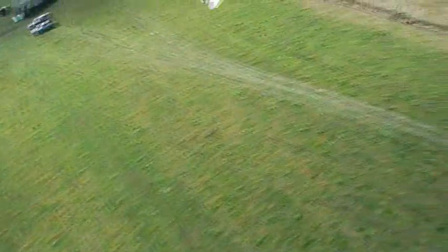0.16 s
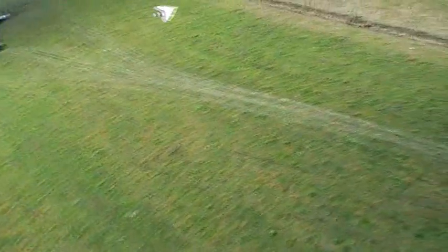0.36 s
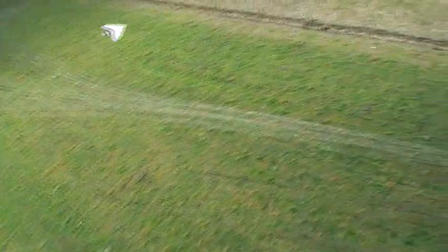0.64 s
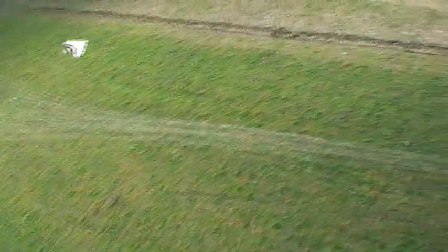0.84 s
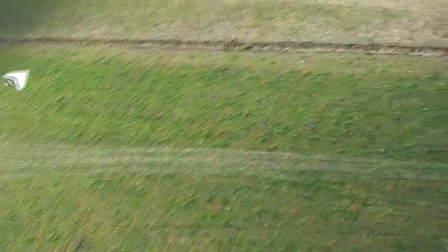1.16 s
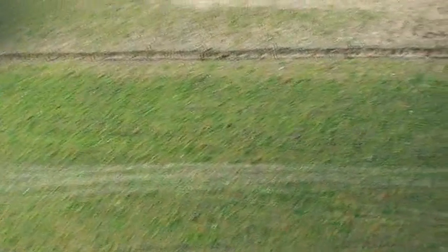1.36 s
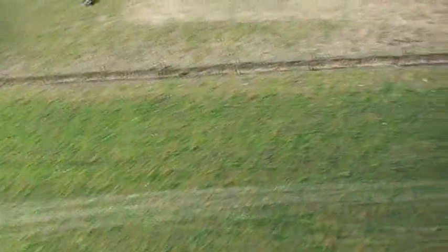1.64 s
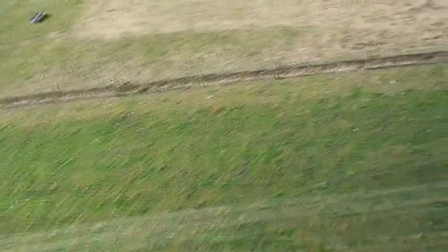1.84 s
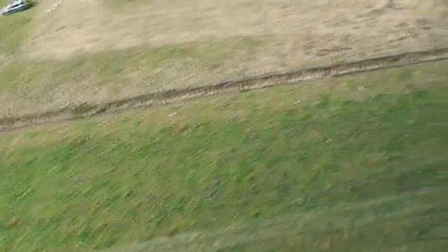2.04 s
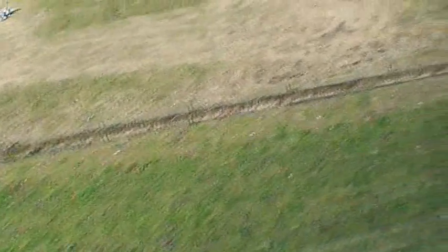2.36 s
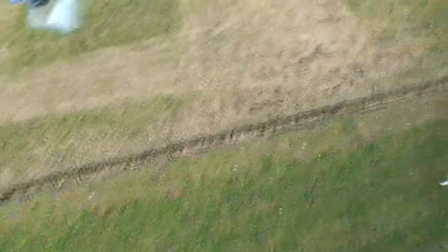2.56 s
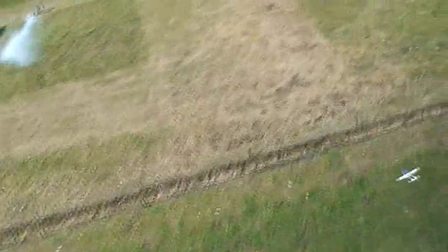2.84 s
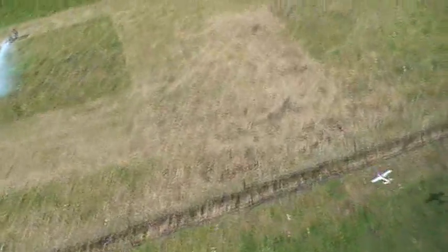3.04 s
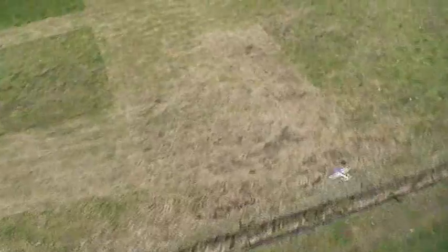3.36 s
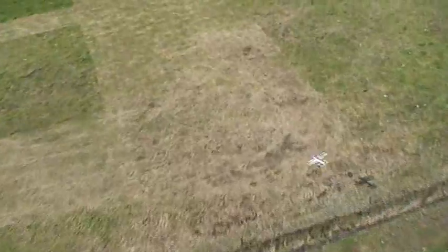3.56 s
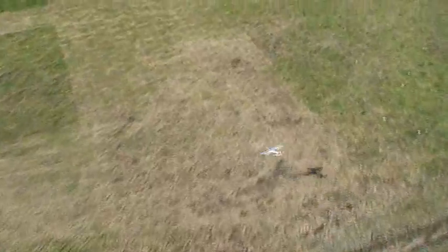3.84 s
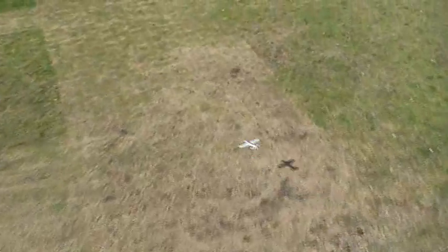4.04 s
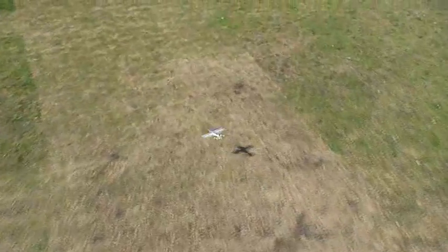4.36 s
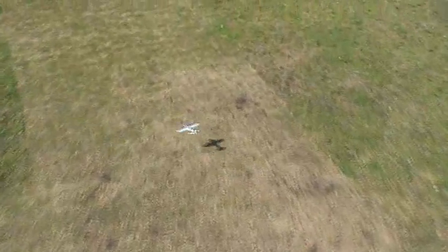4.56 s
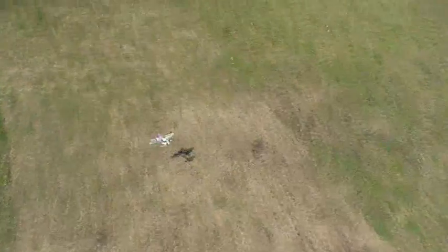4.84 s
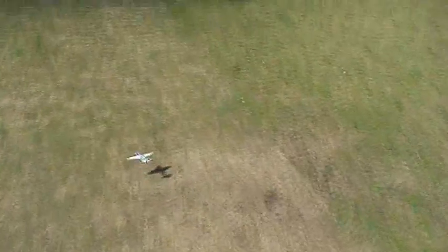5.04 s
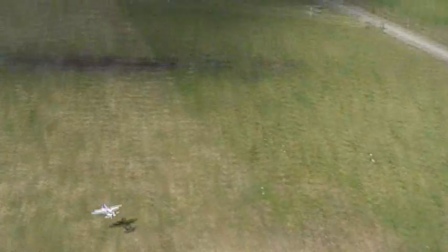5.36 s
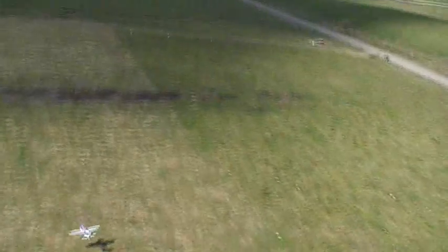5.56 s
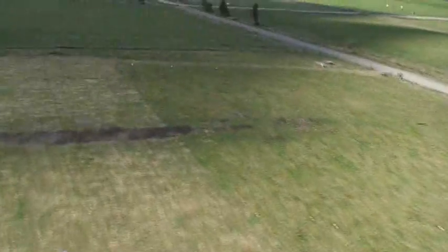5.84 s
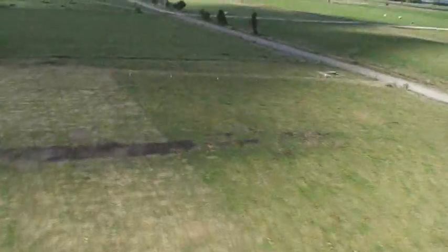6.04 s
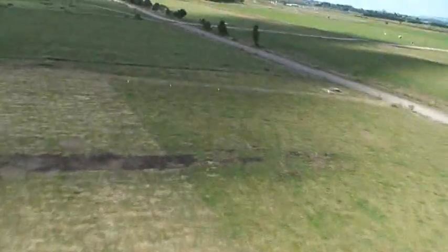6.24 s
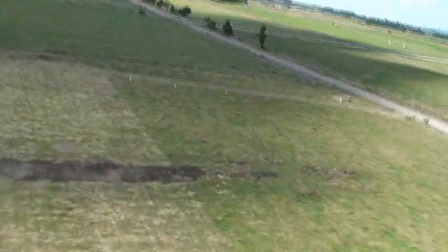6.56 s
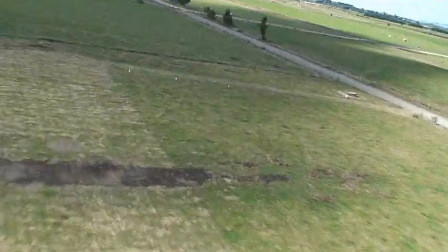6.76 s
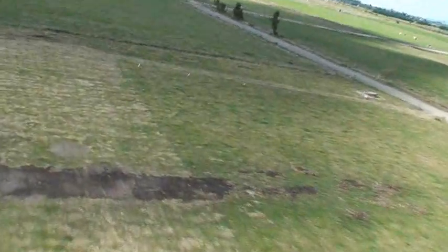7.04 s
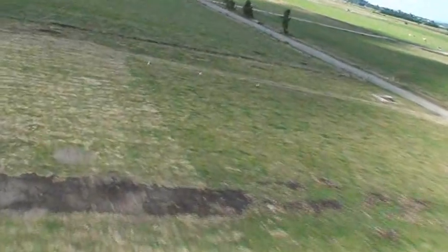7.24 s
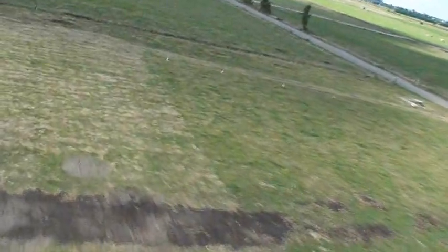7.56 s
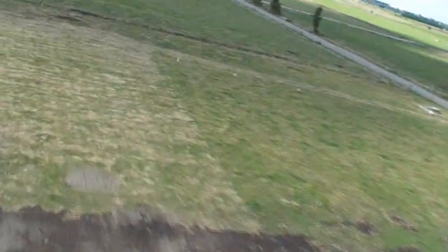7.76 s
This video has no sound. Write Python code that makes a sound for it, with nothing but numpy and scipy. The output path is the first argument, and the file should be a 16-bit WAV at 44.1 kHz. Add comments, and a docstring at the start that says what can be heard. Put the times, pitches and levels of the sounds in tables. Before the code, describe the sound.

Close on-board stereo sound of an electric model helicopter flying over a field, lasting about 8 seconds. From the start, a hard, high motor whine and piercing squeal throb very rapidly with the rotor, amid gritty gear hiss, a low blade and shaft thrum, and a faint chirr about four times a second. The drive is strongest around 1.3 seconds. Rushing air, weighted to the right, rises from about 2.5 seconds as the motor eases. Near 3.3 seconds a fuzzy hollow tone emerges; from 3.8 to 4.9 seconds it wavers in strong hoots as the air swings around. A heavy gust peaks just before 5 seconds. The hoot then falls to a low drone, and the wind becomes a broad, centred roar. Around 6 seconds the motor runs slightly faster but softer, with a more chattering squeal. The roar gradually eases towards the end while the whine continues.

```python
"""Low over a field, on the frame of an electric model helicopter: a camera's two microphone ports, close to the drive.
Motor partials and gear hiss throb with the rotor, a squeal is chopped by the drive's grip, blade and shaft tones
thrum below; a faint chirr comes round about four times a second. Air is shaped noise, rushing in from the right; in a
fast turn it swings head-on, shed eddies hoot in the housing's cavity, then it settles to a lower roar.
The turn unloads the motor, which speeds up and sings more softly."""
import sys
import numpy as np
from scipy import signal
from scipy.fft import rfft, irfft, next_fast_len
from scipy.io import wavfile
from scipy.ndimage import uniform_filter1d, minimum_filter1d, map_coordinates

SR = 44100
rng = np.random.default_rng(int(sys.argv[2]) if len(sys.argv) > 2 else 0)


def to_wav(sig):
    """Store sig (one row per channel, or 1-D mono) as 16-bit WAV at the path in sys.argv[1].

    Samples outside -1..1 are clipped; the rate is SR.
    """
    pcm = np.clip(np.atleast_2d(sig), -1, 1) * 32767
    pcm = np.round(pcm).astype(np.int16)
    wavfile.write(sys.argv[1], SR, pcm.T)  # frames by channels


N = 348831

# motor speed along the flight: t/s, speed/(turns per s)
MOTOR_SPEED = [(0, 343.2), (.35, 340.4), (1, 336.5), (1.4, 335.5), (2, 334.7), (2.6, 335.4), (4.3, 335.4),
               (4.8, 335.9), (5.3, 337.7), (6.05, 343.7), (6.4, 345), (7.2, 342.7), (7.9, 341)]
# how hard the drive binds: place/(rotor turn, 0-1), lower squeal/dB, upper squeal/dB (both relative)
DRIVE_GRIP = [(.06, 0, -6), (.18, .5, -6), (.25, -18, -11), (.4, -15, -5), (.56, -7, -7), (.72, -2, 1),
              (.84, -7, -3), (.97, -6, -7)]
# where the air comes from: t/s, direction/(0 = from the right, 1 = head-on)
AIR_HEADING = [(0, 0.13), (3.6, 0.024), (3.95, 0.43), (4.3, 0.42), (4.9, 0.59), (5.03, 0.83), (6.3, 0.85),
               (7, 0.89)]
# eddies shed across the housing's opening: t/s, mean shedding rate f/Hz
SHEDDING_RATE = [(0, 680), (2.6, 680), (3.28, 560), (3.35, 445), (3.45, 420), (3.5, 520), (3.66, 550),
                 (3.74, 480), (3.83, 450), (3.85, 362), (3.92, 378), (3.97, 352), (4.03, 360), (4.07, 395),
                 (4.13, 420), (4.25, 480), (4.31, 470), (4.354, 401), (4.46, 408), (4.55, 370), (4.6, 390),
                 (4.66, 353), (4.73, 376), (4.8, 394), (4.87, 376), (4.91, 352), (4.962, 345), (4.977, 318),
                 (4.99, 260), (5.4, 243), (5.5, 205), (6.5, 195), (6.9, 235), (7.4, 240), (7.65, 165),
                 (7.9, 205)]

GEAR_RATIO = 12.15  # motor turns per rotor turn
BELT_LAP_TURNS = 85.1  # motor turns in one lap of the belt
CAVITY_HZ, CAVITY_WIDTH_HZ = 358.6, 43.8  # the resonance that the eddies lock to; its half width


def amp(db):
    """Decibels to gain."""
    return 10 ** (np.asarray(db) / 20)


def unit(x):
    """Scale to rms 1."""
    return x / np.sqrt(np.mean(np.abs(x) ** 2) + 1e-20)


def curves(rows):
    """One value per sample for each column after the time."""
    s, *cols = np.transpose(rows)
    return [np.interp(np.arange(N) / SR, s, c) for c in cols]


def wobble(rate):
    """A smooth random curve of rms 1, rate knots a second."""
    knots = rng.standard_normal(int(N * rate / SR) + 4)
    coarse = np.arange(0, N + 32, 32)
    curve = map_coordinates(knots, [coarse * rate / SR])
    return unit(np.interp(np.arange(N), coarse, curve))


def noise(spectrum, channels=1):
    """Unrelated noises with the given colour, rms 1 over all channels."""
    size = next_fast_len(N + 8192)
    hz, db = np.transpose(spectrum)
    gain = amp(np.interp(np.log(np.fft.rfftfreq(size, 1 / SR) + 1), np.log(hz), db))
    white = rng.standard_normal((channels, size))
    return unit(irfft(rfft(white) * gain, size)[:, :N])


def pair(spectrum, alike):
    """Stereo noise with a share of its power common to both sides."""
    alike = np.clip(alike, 0, 1)
    return np.sqrt(alike) * noise(spectrum) + np.sqrt(1 - alike) * noise(spectrum, channels=2)


def runout(rotor, fall, count=7):
    """The main gear's unevenness: a random pattern that repeats with each rotor turn."""
    k = np.arange(1, count + 1)[:, None]
    angle = np.linspace(0, 2 * np.pi, 2 ** 10)
    start = rng.uniform(0, 2 * np.pi, k.shape)
    shape = unit(np.sum(k ** -fall * np.cos(k * angle + start), 0))
    turn = rotor / (2 * np.pi) % 1
    return shape[(turn * len(shape)).astype(int)]


def racing():
    """0 up to cruising speed, 1 when the unloaded motor fully races."""
    cruise_rps, race_rps = 336, 8  # cruising speed; speed added when racing (turns per s)
    return np.clip((curves(MOTOR_SPEED)[0] - cruise_rps) / race_rps, 0, 1)


def whine(motor, rotor, load_db, sway=0.2, throb=0.27, flutter_db=0.78, level_db=-2.0):
    """Fourteen magnets and the gear mesh sing; rotor turns shake them, and belt laps make them surge in turn."""
    # partials: multiple of motor speed, left/dB, right/dB (at 0 dB load, before level_db),
    # slope/(dB per dB of load), racing left/dB, racing right/dB,
    # surge once a belt lap/dB, crest left/(lap, 0-1), crest right/(lap, 0-1)
    partials = [(7, -27.8, -28.7, .95, -1, -1, 0, 0, 0), (7.41, -40.3, -40.5, .35, -3, -2, 0, 0, 0),
                (8, -40, -37.5, .5, 3, 2, 1.9, .81, .74), (9, -34.3, -44, .55, 5, 10, 1.9, .08, .12),
                (10, -44.5, -30.5, .3, 0, 1, 0, 0, 0), (11, -44, -48.5, .5, .5, 0, 2.5, .63, .66),
                (13, -35.5, -39.3, .55, -9, 0, 3.5, .1, .3), (14.41, -39.5, -44.3, .45, 0, 0, 0, 0, 0),
                (15, -48.5, -46, .7, 3, 4, 3, .75, .09), (20, -40.3, -35.7, .7, -2, 0, 5.5, .23, .09),
                (22, -38.3, -42.5, .5, -1.5, -2, 3.5, .22, .45), (23, -43.3, -44, .42, -3, 2.5, 4, .74, .3),
                (24, -45.5, -41.5, .6, -1, -1, 3, .34, .28), (26, -45.5, -49.5, .6, 0, 0, 3, .51, .67),
                (27, -42, -44.5, .7, -1, -1, 2, .83, .07), (28, -49, -45, .6, 0, 0, 2, .26, .49),
                (29, -45, -44, .7, 0, 0, 2, .85, .88), (31, -50, -49, .6, 0, 0, 3, .51, .55),
                (36, -54, -54, .6, 0, 0, 0, 0, 0)]
    out = np.zeros((2, N))
    drift = .003 * wobble(20)
    race, lap = racing(), motor / BELT_LAP_TURNS
    for (order, left_db, right_db, per_load, race_left_db, race_right_db,
         surge_db, left_at, right_at) in partials:
        shake = sway * np.sqrt(order / 7) * runout(rotor, fall=0.46) + order * drift
        strength = amp(level_db + per_load * load_db + flutter_db * wobble(9.8))
        strength = strength * (1 + throb * runout(rotor, fall=0.25))
        crest = 2 * np.pi * np.array([[left_at], [right_at]])
        surge = surge_db * np.cos(lap - crest)
        sides_db = [left_db + race_left_db * race, right_db + race_right_db * race]
        phase = order * motor + shake + rng.uniform(0, 2 * np.pi)
        lag = np.array([[0], [rng.normal(0, order / 24)]])  # higher partials differ more between the ports
        out += np.sqrt(2) * amp(surge + sides_db) * strength * np.sin(phase + lag)
    return out


def squeal(motor, rotor, load_db, rattle=1.5, swing=3.24, third_db=-4.0, third_per_load=0.13,
           rasp_db=-8, jitter_db=0.9):
    """The drive binds and lets go each rotor turn, chopping the squeal; racing, it chatters three times a turn."""
    # rough noise riding on the squeal: f/Hz, relative level/dB
    rasp_colour = [(1500, -38), (4200, -23), (4850, 4), (5500, -23), (6500, -18), (7150, 9), (8200, -13),
                   (10000, -9), (15000, -11)]
    base_db, per_load = -30.5, 0.77  # before side gains, at 0 dB load; dB per dB of load
    level = amp(base_db + per_load * load_db)
    chatter = .7 * racing() ** 1.7  # share of chatter in the grip
    turn = rotor / (2 * np.pi) % 1
    place, *grips_db = np.transpose(DRIVE_GRIP)
    pulses = unit(.4 + np.cos(1.5 * rotor + 1) ** 4)  # three a turn
    jitter = amp(jitter_db * wobble(110))
    grips = []
    for grip_db in grips_db:
        binding = unit(amp(np.interp(turn, place, grip_db, period=1)))
        grips.append(jitter * unit((1 - chatter) * binding + chatter * pulses))
    low_grip, high_grip = grips
    # the tone runs sharp while the drive binds and drops back as it lets go
    slip = (1 - chatter) * swing * np.interp(turn, [.25, .4], [1, 0], period=1)
    slip = slip + rattle * chatter ** 2 * wobble(260)  # a racing drive rattles and frays the tone
    second = np.sin(14 * motor + slip + [[0], [.3]])
    third = np.sin(21 * motor + slip + [[0], [-.5]])
    third = third * amp(1.2 * wobble(10) + [[1], [-1]])  # stronger on the left, level unsteady
    tones = low_grip * second + amp(third_db + third_per_load * load_db) * high_grip * third
    rasp = amp(rasp_db) * np.sqrt(low_grip * high_grip) * pair(rasp_colour, alike=0.12)
    return level * (np.sqrt(2) * tones * amp([[1.5], [-1.8]]) + rasp)


def gear_noise(motor, rotor, load_db, repeat=0.15):
    """Teeth hiss in time with the rotor; a chirr, perhaps the tail belt, returns once a lap."""
    # colour of the hiss: f/Hz, relative level/dB
    hiss_colour = [(500, -8.5), (1900, -2), (2200, -0.5), (2500, 4.5), (2900, 0), (3500, -3), (4100, -6),
                   (4900, -1), (5600, -6), (7200, -5.5), (8400, -8.5), (9500, -6), (11000, -13.5),
                   (13000, -18), (15200, -22)]
    # colour of the chirr: f/Hz, relative level/dB
    chirr_colour = [(2000, -40), (6000, -1.5), (7300, -4), (8000, 6.5), (8700, -13), (12000, -20),
                    (16000, -35)]
    hiss_db, hiss_per_load, hiss_per_grip = -24.5, 0.56, .08  # at 0 dB load; dB per dB of load, of grip
    chirr_db, chirr_per_load = -32, .48  # at 0 dB load, at the crest; dB per dB of load
    chirr_laps = .16  # from the crest to 1/e of its amplitude

    # the same teeth meet on every turn, so part of the hiss repeats
    size = int(2 * np.pi * N / rotor[-1])
    place = rotor / (2 * np.pi) % 1 * size
    loops = [side[:size] for side in pair(hiss_colour, alike=0.15)]
    tooth_pattern = np.array([map_coordinates(loop, [place], mode="grid-wrap") for loop in loops])
    repeat = np.clip(repeat, 0, 1)
    hiss = np.sqrt(repeat) * unit(tooth_pattern) + np.sqrt(1 - repeat) * pair(hiss_colour, alike=0.14)
    turn, grip_db, _ = np.transpose(DRIVE_GRIP)
    binding_db = np.interp(rotor / (2 * np.pi), turn, grip_db - grip_db.mean(), period=1)
    unsteady_db = 0.5 * runout(rotor, fall=0.51) + 0.72 * wobble(30)
    hiss = hiss * amp(hiss_db + hiss_per_load * load_db + hiss_per_grip * binding_db + unsteady_db)

    lap = (motor / (2 * np.pi * BELT_LAP_TURNS) + 1 / 6) % 1 - .5  # 0 at the chirr's crest
    teeth = unit(sum(np.sin(k * motor + .8 * wobble(60)) for k in (23, 24)))
    chirr = pair(chirr_colour, alike=0.12) + amp(-24.0) * teeth
    chirr_gain = amp(chirr_db + chirr_per_load * load_db + 1.4 * wobble(4.9))
    return hiss + chirr * chirr_gain * np.exp(-(lap / chirr_laps) ** 2)


def low_hum(rotor, load_db):
    """Blades and motor shaft hum low, a little unsteadily."""
    # low tones: multiple of rotor speed (12.15 is the motor shaft's own), rms level/dB at 0 dB load
    low_tones = [(2, -46), (4, -53), (6, -46), (9.03, -37), (10, -46), (12.15, -36), (15, -40), (24.3, -48)]
    tones = sum(amp(db + 1.0 * wobble(4.83)) * np.sin(k * rotor + .5 * wobble(4.5))
                for k, db in low_tones)
    return np.sqrt(2) * amp(0.51 * load_db) * tones


def flow_strength():
    """The air's strength in dB: the speed of flight plus short rises and dips."""
    # slow strength of the air: t/s, level/dB
    flight_flow = [(0, -30.5), (1.15, -32.5), (1.5, -30.5), (2.2, -29), (2.53, -30.5), (2.69, -27),
                   (3.25, -25), (3.6, -24.5), (4.3, -20.5), (4.85, -18), (5.05, -19), (6, -21),
                   (6.4, -21.5), (7.4, -23), (7.9, -24)]
    # gusts and lulls: t/s, length/s, level/dB (rise, or dip if negative)
    gusts = [(1.903, 0.2, 1), (2.153, .14, 1.1), (2.396, 0.1, -2), (2.69, 0.069, 1.5), (3.04, 0.16, 0),
             (3.258, 0.1, -2), (3.394, 0.11, 0.5), (3.78, 0.15, 0.5), (3.922, 0.26, 4), (4.698, 0.11, 1.5),
             (4.93, .085, 6), (6.09, 0.073, 2), (6.683, 0.17, 1.5), (7.417, 0.081, 1.5)]
    t = np.arange(N) / SR
    bumps = sum(db * np.exp(-(2 * (t - s) / length) ** 2) for s, length, db in gusts)
    return curves(flight_flow)[0] + bumps


def locking(flow_db):
    """How near the eddies are to the cavity's pitch, and the share of them that is locked into a tone."""
    lock_flow_db, lock_range_db = -18.1, 1.2  # flow for two thirds of full locking; how gradual
    ring_s = 0.0083  # the cavity rings on this long after the eddies leave its pitch
    offset = (curves(SHEDDING_RATE)[0] - CAVITY_HZ) / CAVITY_WIDTH_HZ
    in_tune = 1 / (1 + offset ** 2)
    keep = np.exp(-1 / (ring_s * SR))
    in_tune = np.maximum(in_tune, signal.lfilter([1 - keep], [1, -keep], in_tune))
    steady = .8 * in_tune / (2 + np.exp((lock_flow_db - flow_db) / lock_range_db))  # 0.4 at most
    return in_tune, steady


def airflow(flow_db, leak=0.055, gust_db=0.72):
    """Each port has its own turbulence, the housing's roar reaches both alike; heading shares the flow out."""
    # turbulence at a microphone port: f/Hz, relative level/dB
    port_colour = [(20, -34), (60, -30), (130, -15), (250, -4.5), (480, 0.5), (700, -3.5), (1000, -9),
                   (1500, -16.5), (2200, -29), (4000, -36), (15000, -45)]
    # roar in the housing: f/Hz, relative level/dB
    housing_colour = [(20, -54), (60, -32), (110, -11.5), (200, -5.5), (280, 0), (550, -1), (800, -5.5),
                      (1200, -25.5), (4000, -76)]
    # spray of air off the edge: f/Hz, relative level/dB
    spray_colour = [(30, -40), (100, -32), (500, -5), (1000, 4), (2000, -8), (3500, -15), (7000, -23.5),
                    (15000, -31)]
    # low buffeting: f/Hz, relative level/dB
    buffet_colour = [(20, -11), (60, -1.5), (130, -1.5), (300, -4.5), (1000, -36), (4000, -80)]
    # over the flow: (dB with air from the right, dB head-on,
    # curve: over 1 = changes late in the turn, dB added while the housing hoots)
    left_port, right_port = (-11, 2, 0.6, 5), (16, -5.5, 1.77, -2)
    housing_roar, edge_spray = (-0.4, 7.5, 2, -3.5), (-1.6, -0.26, 0.43, 1)

    heading = np.clip(curves(AIR_HEADING)[0], 1e-3, 1)
    in_tune = locking(flow_db)[0]
    levels_db = [flow_db + side_db + heading ** curve * (front_db - side_db) + hooting_db * in_tune
                 for side_db, front_db, curve, hooting_db
                 in (left_port, right_port, housing_roar, edge_spray)]
    left_db, right_db, housing_db, spray_db = levels_db
    # the buffeting drops by up to 26 dB, in full once the heading reaches 0.8
    buffet_db = -18.5 + 0.37 * flow_db - 26 * np.minimum(1, heading / .8)
    left = amp(left_db + gust_db * wobble(12)) * noise(port_colour)[0]
    right = amp(right_db + gust_db * wobble(16)) * noise(port_colour)[0]
    ports = np.array([left - leak * right, right])  # a push on the right port pulls slightly on the left
    roar = amp(housing_db + gust_db * wobble(12)) * noise(housing_colour)
    # the common part of the spray pushes one port as it pulls the other
    spray = amp(spray_db) * pair(spray_colour, alike=0.25) * [[1], [-1]]
    return ports + roar + spray + amp(buffet_db) * pair(buffet_colour, alike=0.5)


def hoot(flow_db, overtone_db=-22, selectivity=0.59, rise=0.6):
    """Shed eddies make a fuzzy band that narrows and swells near the cavity's pitch, and drones in head-on air."""
    hoot_db, hoot_per_flow = 11, 1  # on resonance, over the flow, before side gains; dB per dB of flow
    drone_db = -25.5  # away from the cavity's pitch, in fully head-on air
    sides_db = (-6.5, 2.5)  # left, right gain while the air comes from the right
    eddy_spread, lock_narrowing = .46, .5  # new eddy trains per cycle; share by which the cavity slows them
    wander = .04  # rms share of the shedding rate, far from the cavity's pitch
    in_tune, steady = locking(flow_db)
    heading = curves(AIR_HEADING)[0]
    hz = curves(SHEDDING_RATE)[0] * (1 + wander * (1 - in_tune) ** 3 * wobble(14))
    age = np.cumsum(eddy_spread * hz * (1 - lock_narrowing * in_tune)) / SR  # eddy trains shed so far
    in_phase = map_coordinates(rng.standard_normal(SR), [age])
    quadrature = map_coordinates(rng.standard_normal(SR), [age])
    eddies = unit(in_phase + 1j * quadrature)
    carrier = np.exp(2j * np.pi * np.cumsum(hz) / SR)
    swing = (np.sqrt(steady) + np.sqrt(1 - steady) * eddies) * carrier
    swing = unit(swing / np.sqrt(1 + 2 * np.abs(swing) ** 2))  # the oscillation saturates
    resonant = amp(hoot_db + hoot_per_flow * flow_db) * in_tune ** selectivity
    resonant = resonant * (hz / CAVITY_HZ) ** rise  # faster eddies push harder
    drone = amp(drone_db) * heading ** 2
    sides = amp(np.outer(sides_db, (1 - heading) ** 2))
    voice = np.real(swing + amp(overtone_db) * steady * swing ** 3)
    return np.sqrt(2) * sides * np.hypot(resonant, drone) * voice


def scene():
    """One motor speed and one load drive every moving part; one air flow drives the rush and the hoot."""
    # load on the motor: t/s, level/dB
    motor_load = [(0, -2.5), (1.25, 1.5), (1.95, -2), (2.58, -0.5), (2.7, -5), (3.6, -6.5), (4.85, -9.5),
                  (5.7, -8.5), (6.7, -7), (7.9, -8.5)]
    motor = 2 * np.pi * np.cumsum(curves(MOTOR_SPEED)[0]) / SR  # shaft angle, radians
    rotor = motor / GEAR_RATIO
    load_db, flow_db = curves(motor_load)[0], flow_strength()
    tones = whine(motor, rotor, load_db) + squeal(motor, rotor, load_db)
    air = airflow(flow_db) + hoot(flow_db)
    return tones + gear_noise(motor, rotor, load_db) + low_hum(rotor, load_db) + air


def record(dry, ceiling=0.97, hold=0.0065):
    """The camera limits loud swells and clips the rest; its converter mirrors sound faintly into the treble."""
    mirror_hz, mirror_db = 16000, -11.5  # f lands on mirror_hz - f; gain of the image at half mirror_hz
    top_hz = 15600  # band limit
    needed = np.minimum(1, ceiling / (np.abs(dry).max(0) + 1e-9))
    span = int(hold * SR)
    gain = uniform_filter1d(minimum_filter1d(needed, span), 2 * span)
    held = np.clip(dry * gain, -1, 1)
    size = next_fast_len(N + 8192)
    hz = np.fft.rfftfreq(size, 1 / SR)
    tilt = (2 * hz / mirror_hz) ** 1.2 * (hz < mirror_hz / 2) * (hz > 1500)
    source = irfft(rfft(held, size) * tilt, size)[:, :N]
    mirror = source * 2 * np.cos(2 * np.pi * mirror_hz * np.arange(N) / SR)
    mixed = held + amp(mirror_db) * mirror
    return irfft(rfft(mixed, size) * (hz < top_hz), size)[:, :N]


dry = scene()
out = record(dry)
to_wav(out)
```